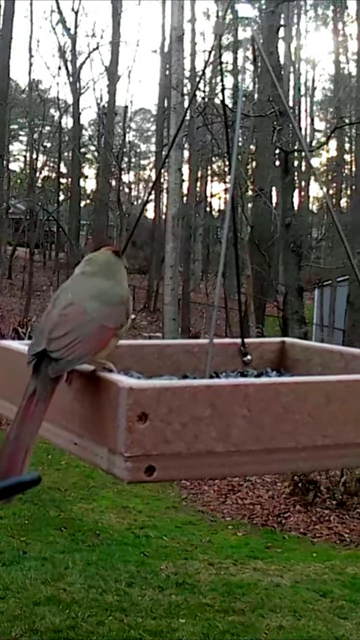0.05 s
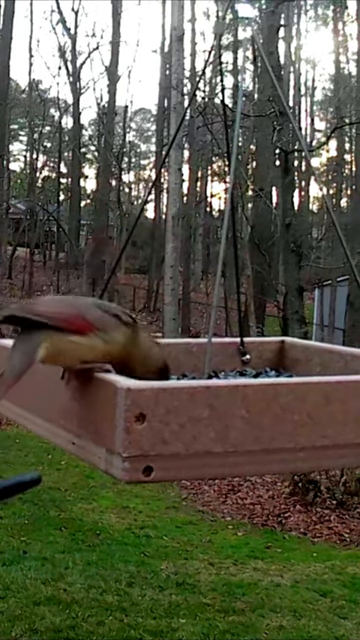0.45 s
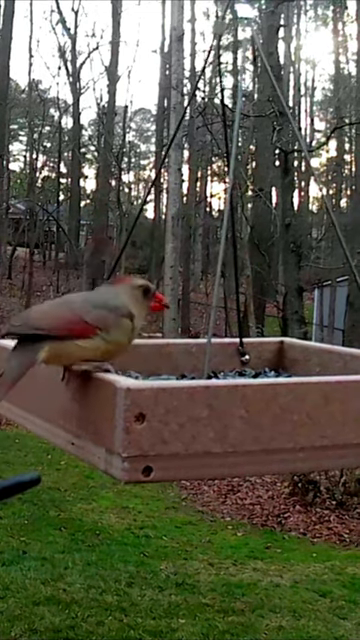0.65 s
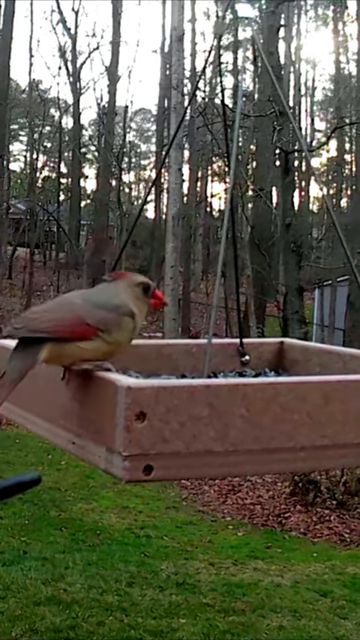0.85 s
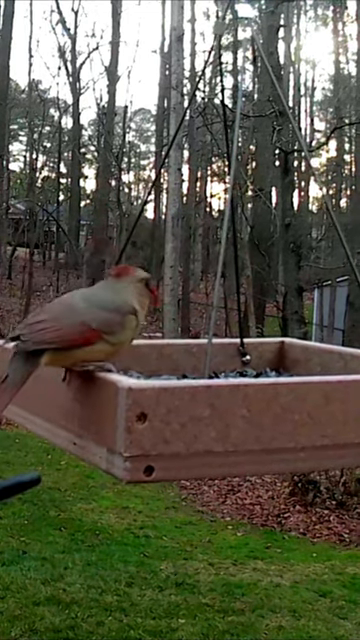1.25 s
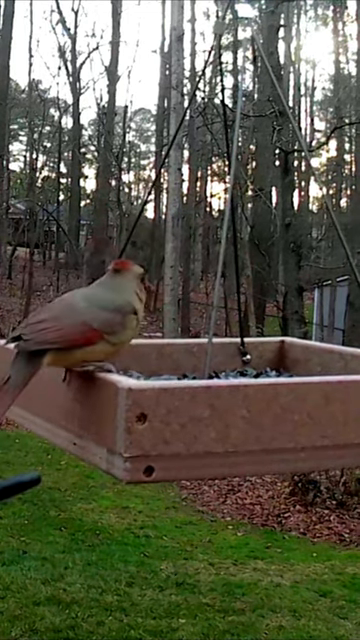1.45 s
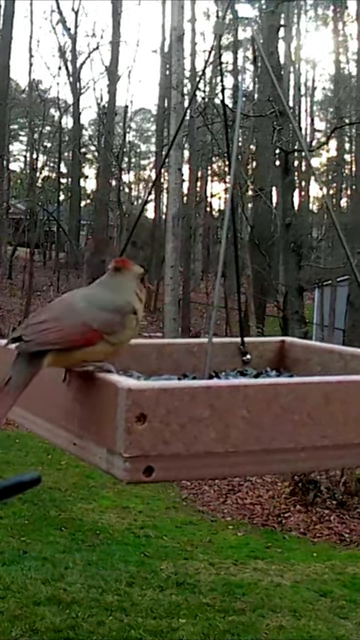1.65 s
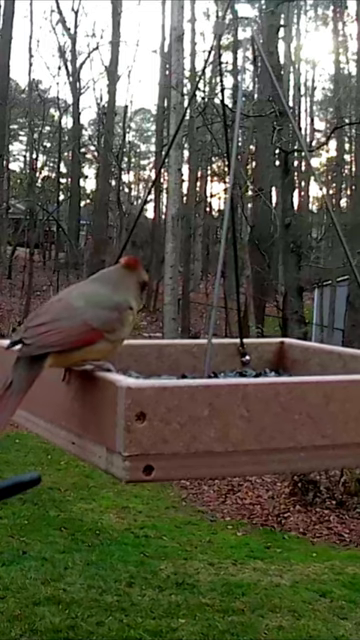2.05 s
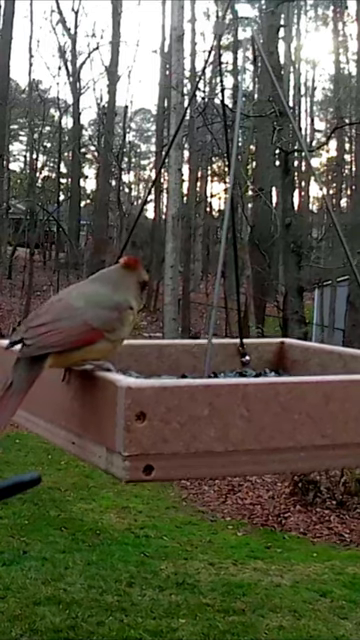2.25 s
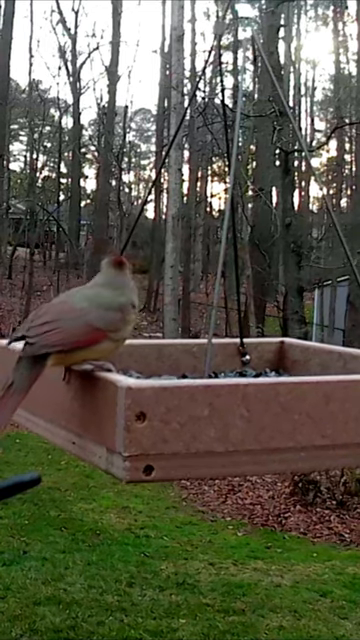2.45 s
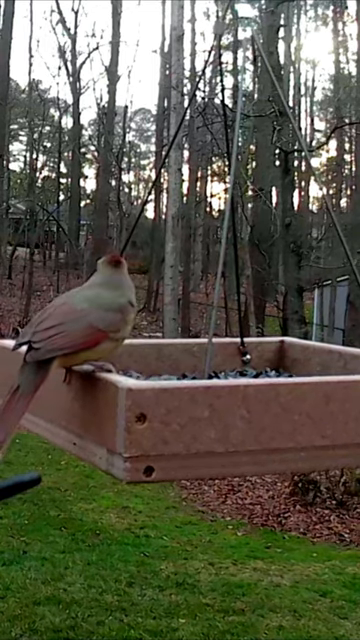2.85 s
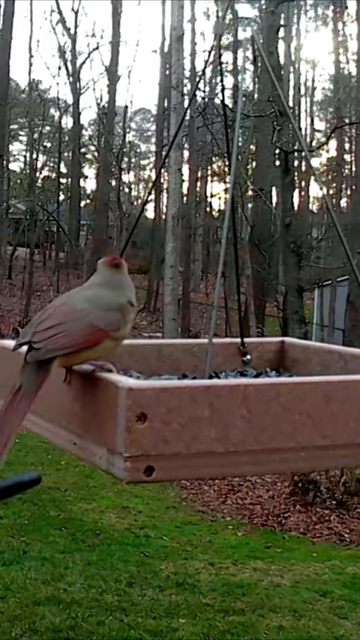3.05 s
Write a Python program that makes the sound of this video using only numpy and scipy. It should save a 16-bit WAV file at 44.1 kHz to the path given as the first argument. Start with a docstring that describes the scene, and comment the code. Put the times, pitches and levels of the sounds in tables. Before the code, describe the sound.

Small birds chirp faintly over a distant traffic hush, with one light, dry knock.

```python
"""Small birds whistle short slurred notes, near and far, in a wooded yard heard from a hanging feeder.
Each note is a gliding, nearly pure tone that the trees scatter into reverberation. A bird shifts on
the tray, exciting its low modes of shudder and sway, and ticks a seed in its beak. One dry double
knock rings out. Behind it all lies the broadband hush of distant traffic."""
import sys
import numpy as np
from scipy import signal
from scipy.fft import rfft, irfft
from scipy.io import wavfile
from scipy.ndimage import uniform_filter1d, map_coordinates

SR = 44100
rng = np.random.default_rng(int(sys.argv[2]) if len(sys.argv) > 2 else 0)


def persist_wave(psi):
    """Save psi, clipped to +-1, as 16-bit WAV."""
    counts = np.round(np.clip(psi, -1, 1) * 32767).astype(np.int16)
    wavfile.write(sys.argv[1], SR, np.atleast_2d(counts).T)


N = 136710
TOP_HZ = 15650  # upper band limit


def near_birds(gain_db=1, unsteadiness=0.0093):
    """Direct and reverberant sound: each whistle arrives straight, then scattered by the trees."""
    # near whistles: start_s, length_s, level_db before gain, crest_fraction, echo_db, five of pitch_hz
    whistles = [(.779, .035, -59, .55, -5, 4380, 4120, 3940, 3950, 4230),
                (.811, .040, -69, .6, -6, 6960, 7000, 7060, 7100, 7110),
                (.852, .022, -75, .5, -3, 7200, 7300, 7400, 7480, 7550),
                (.928, .094, -54.8, .76, -4, 4020, 4090, 3580, 3500, 4130),
                (1.566, .068, -65.5, .66, -7, 3380, 3370, 3180, 2830, 2300),
                (1.876, .058, -70, .3, 0, 4050, 4100, 4020, 4080, 4020),
                (1.908, .030, -67, .5, -1, 3350, 3480, 3520, 3480, 3400),
                (2.030, .080, -64, .62, -7, 3310, 3350, 3360, 2950, 2300),
                (2.060, .025, -70, .4, -5, 4350, 4330, 4280, 4230, 4200),
                (2.254, .068, -59.5, .85, -6, 3780, 4050, 4040, 3650, 3280),
                (2.335, .017, -60.5, .45, -7, 3280, 3360, 3540, 3830, 4100)]
    waver = unsteadiness * walk(400)
    direct, scattered = 0, 0
    for start_s, length_s, level_db, crest, echo_db, *pitches_hz in whistles:
        whistle = note(start_s, length_s, level_db + gain_db, crest, pitches_hz, waver)
        direct += whistle
        scattered += undb(echo_db) * whistle
    return direct + trees(scattered, t60_s=0.49)


def note(start_s, length_s, level_db, crest, pitches_hz, waver, edge_db=-10.5, fade_s=0.0023):
    """Frequency modulation: a tone glides through pitches evenly spaced in time, swells and fades."""
    out = np.zeros(N)
    span = np.arange(max(int(start_s * SR), 0), min(int((start_s + length_s) * SR), N))
    progress = np.linspace(0, 1, len(span))
    position = progress * (len(pitches_hz) - 1)
    glide = map_coordinates(np.array(pitches_hz, float), [position], order=3, mode="nearest")
    swell = undb(level_db + np.interp(progress, [0, crest, 1], [edge_db, 0, edge_db]))
    fade = np.clip(np.minimum(progress, 1 - progress) * length_s / fade_s, 0, 1)
    out[span] = swell * fade * tone(glide * (1 + waver[span]))
    return out


def feeder(rise_s=0.028):
    """Free vibration: shoves set off a shudder and a slower, longer sway; soft bumps damp quickly."""
    # the bird's shoves on the tray: start_s, sway_db, shudder_db
    shoves = [(0.206, -45.5, -38.5), (0.298, -31.5, -35), (.385, -30, -33), (1.418, -42.5, -60.5)]
    # soft bumps through the tray: start_s, level_db
    bumps = [(.06, -46), (3.069, -58)]
    # the tray's modes for each motion: frequency_hz, gain_db, t60_s
    sway_modes = [(8.293, -5, 4.7), (17.29, 4, 5.86), (24.88, -9.5, 2.2), (32.77, -18, 3)]
    shudder_modes = [(43.1, -18.5, 1.6), (50.2, -8.5, 2.3), (62.82, 2.5, 1.13), (70.2, -12, 0.92),
                     (119.9, -14.5, 0.69)]
    bump_modes = [(100, 0, 0.15), (126, -8, 0.065)]
    motion = 0
    for start_s, sway_db, shudder_db in shoves:
        motion += undb(sway_db) * ring(start_s, sway_modes, rise_s)
        motion += undb(shudder_db) * ring(start_s, shudder_modes, rise_s)
    return motion + sum(undb(db) * ring(start_s, bump_modes, rise_s) for start_s, db in bumps)


def knock(t, crack_s=0.013, body_s=0.043, echo_db=-10.5):
    """Impact excitation: two contacts each give a crack, woody modes and a hollow after-sound."""
    # contacts of the knock: start_s, level_db
    contacts = [(0.8261, -46), (0.8334, -48)]
    # resonances of the struck body: frequency_hz, gain_db, t60_s
    modes = [(640, -10, 0.16), (1199, -7, 0.29), (1315, 2, 0.17), (1512, 1.5, 0.063), (1580, 8.5, 0.083),
             (1650, -4.5, 0.063), (1885, 3, 0.12), (2137, 1, 0.076), (2477, -6.5, .07), (2560, -19, 0.058)]
    crack = undb(-8.5) * band_noise(1170, 2410)
    body = undb(-17.5) * band_noise(615, 1500)
    direct = 0
    for start_s, level_db in contacts:
        rattle = crack * decay(t, start_s, crack_s) + body * decay(t, start_s, body_s)
        direct += undb(level_db) * (ring(start_s, modes, rise_s=0.0019) + rattle)
    return direct + undb(echo_db) * trees(direct, t60_s=0.13)


def husking(t, tick_s=0.0022):
    """Brief contacts have broad spectra: a seed ticks as the bird turns it in its beak."""
    # husk ticks: start_s, level_db
    ticks = [(.766, -70), (.784, -74), (.792, -74)]
    return band_noise(3500, 6500) * sum(undb(db) * decay(t, start_s, tick_s) for start_s, db in ticks)


def far_birds(t, direct_db=2, echo_db=-2, unsteadiness=0.032):
    """Reverberation and superposition: remote calls blur among twitters and a wash of many birds."""
    # calls deep in the wood: start_s, length_s, level_db before gain, first_pitch_hz, last_pitch_hz
    calls = [(0.284, 0.072, -68, 3180, 3495), (.298, 0.047, -62, 1667, 1530),
             (0.301, 0.03, -69.5, 4800, 3470), (0.381, 0.17, -74, 3340, 3116),
             (.415, 0.024, -64, 2248, 2150), (.44, 0.044, -72, 4070, 4630),
             (0.444, 0.16, -73.5, 2464, 2750), (0.609, .045, -69.5, 4270, 3420),
             (0.653, 0.035, -67, 1990, 4590), (.66, 0.056, -71, 3620, 3830),
             (1.043, 0.081, -73, 2450, 1814), (1.163, .125, -68, 1635, 1627),
             (1.155, 0.083, -71, 3420, 3170), (1.206, 0.023, -65.5, 3900, 3580),
             (1.221, .09, -72, 3080, 2360), (1.294, 0.082, -69, 3260, 3140), (1.44, 0.047, -71, 3450, 3600)]
    # bursts of faint twittering: peak_s, spread_s, centre_hz, width_hz, level_db
    bursts = [(0.325, 0.012, 4200, 1400, -70.5), (.47, 0.039, 4450, 900, -73.5),
              (0.515, 0.11, 2720, 700, -71), (0.68, 0.011, 4400, 1800, -71),
              (1.206, 0.051, 3350, 1100, -74), (1.297, 0.056, 2700, 910, -71),
              (1.91, 0.024, 3690, 910, -69), (2.005, 0.21, 4430, 1190, -80.5)]
    # spectrum of the wash: frequency_hz, relative_density_db
    wash_spectrum = [(800, -17.5), (1600, -3), (2600, -10), (3300, 2), (4200, 0.5), (5000, -14),
                     (7000, -26.5)]
    # envelope of the wash: time_s, level_db
    wash_levels = [(0, -77), (.25, -76), (.45, -72.5), (.75, -76.5), (1.25, -73), (1.7, -76.5), (1.95, -73),
                   (2.3, -76), (2.6, -81.5), (3.1, -79.5)]
    waver = unsteadiness * walk(900)
    song = sum(note(start_s, length_s, level_db, crest=0.42, pitches_hz=pitches_hz, waver=waver)
               for start_s, length_s, level_db, *pitches_hz in calls)
    twitter = 0
    for peak_s, spread_s, centre_hz, width_hz, level_db in bursts:
        swell = undb(level_db - 5.1 * ((t - peak_s) / spread_s) ** 2)
        twitter += swell * band_noise(centre_hz - width_hz / 2, centre_hz + width_hz / 2)
    wash = shaped_noise(wash_spectrum) * undb(np.interp(t, *np.array(wash_levels).T))
    echoes = trees(song, t60_s=0.79)
    flicker = undb(2 * walk(90))
    return undb(direct_db) * song + undb(echo_db) * echoes + flicker * twitter + wash


def trees(sound, t60_s, delay_s=0.012, build_s=0.0069, treble_hz=5430, treble_t60_ratio=0.29):
    """Multiple scattering: dense echoes from the trunks come late and die away, the treble first."""
    age = np.maximum(np.arange(SR) / SR - delay_s, 0)
    scatter = rng.standard_normal(SR) * (1 - np.exp(-age / build_s))
    fall = np.exp(-np.log(1000) * age / t60_s)
    low = band(scatter, 100, treble_hz) * fall
    treble = band(scatter, treble_hz, TOP_HZ) * fall ** (1 / treble_t60_ratio)
    response = (low + treble) / np.linalg.norm(scatter * fall)
    return signal.fftconvolve(sound, response)[:N]


def traffic(t, steady_above_hz=5100, flicker_db=1.6, gain_db=0.5, drift=0.003):
    """Incoherent summation: distant traffic merges into a hush, steady on top, with faint whines."""
    # spectrum of the hush: frequency_hz, relative_density_db
    hush_spectrum = [(10, -19), (30, -11), (45, -17), (75, -14.5), (110, -20.5), (156, -24), (230, -27.5),
                     (390, -31), (480, -35), (700, -34.5), (920, -34), (1330, -37.5), (2000, -42.5),
                     (2800, -45), (3900, -48.5), (4700, -53), (5400, -53.5), (6300, -59.5), (7600, -62),
                     (10000, -62), (13000, -65.5), (15500, -63.5)]
    # envelope of its low middle: time_s, level_db before gain
    hush_levels = [(0, -67), (.5, -65), (1.0, -65.5), (1.6, -67.5), (2.4, -67.5), (3.1, -70)]
    # traffic whines that come and go: peak_s, spread_s, pitch_hz, level_db
    whines = [(1.36, 0.15, 322, -67.5), (0.84, 0.19, 396, -72), (1.49, 0.29, 398, -74),
              (1.03, 1.0, 436, -77)]
    noise = shaped_noise(hush_spectrum)
    noise /= np.std(band(noise, 300, 1200))  # the low middle sets the scale
    hz = np.arange(N // 2 + 1) * SR / N
    low = irfft(rfft(noise) / (1 + (hz / steady_above_hz) ** 4), N)
    envelope_db = np.interp(t, *np.array(hush_levels).T)
    hush = low * undb(envelope_db + flicker_db * walk(9.42)) + (noise - low) * undb(envelope_db.mean())
    whine = 0
    for peak_s, spread_s, pitch_hz, level_db in whines:
        swell = undb(level_db - 4.3 * ((t - peak_s) / spread_s) ** 2)
        whine += swell * tone(pitch_hz * (1 + drift * walk(25)))
    return undb(gain_db) * hush + whine


def ring(start_s, modes, rise_s):
    """Modal superposition: damped sinusoids set going at one moment."""
    age = np.maximum(np.arange(N) / SR - start_s, 0)
    ringing = sum(undb(db) * np.sin(2 * np.pi * hz * age) * np.exp(-np.log(1000) * age / t60_s)
                  for hz, db, t60_s in modes)
    return (1 - np.exp(-age / rise_s)) * ringing


def tone(hz):
    """A sinusoid of rms 1 whose phase is the integral of frequency."""
    return np.sqrt(2) * np.sin(2 * np.pi * np.cumsum(hz) / SR)


def decay(t, start_s, time_constant_s):
    """Exponential decay after a sudden onset."""
    return (t > start_s) * np.exp(-abs(t - start_s) / time_constant_s)


def shaped_noise(spectrum):
    """Spectral shaping: white noise weighted by a curve over log frequency, at rms 1."""
    points_hz, points_db = np.array(spectrum).T
    hz = np.maximum(np.arange(N // 2 + 1) * SR / N, 1)
    gain = undb(np.interp(np.log(hz), np.log(points_hz), points_db))
    return unit(irfft(rfft(rng.standard_normal(N)) * gain, N))


def band_noise(low_hz, high_hz):
    """Band-limited noise of rms 1."""
    return unit(band(rng.standard_normal(N), low_hz, high_hz))


def band(x, low_hz, high_hz):
    """Steep band-pass filtering."""
    return signal.sosfilt(signal.butter(4, [low_hz, high_hz], "band", fs=SR, output="sos"), x)


def walk(rate_hz):
    """Random modulation: held levels, smoothed twice, at rms 1."""
    hold = int(SR / rate_hz)
    steps = rng.standard_normal(N)[np.arange(N) // hold]
    return unit(uniform_filter1d(uniform_filter1d(steps, hold), hold))


def undb(db):
    """Decibels to amplitude ratio."""
    return 10 ** (np.asarray(db) / 20)


def unit(x):
    """Normalisation to rms 1."""
    return x / np.sqrt(np.mean(x ** 2) + 1e-30)


def scene():
    """Linear superposition: birds, knock, feeder and traffic add at one point."""
    t = np.arange(N) / SR
    return (traffic(t) + near_birds() + far_birds(t) + knock(t) + husking(t) + feeder())[None]


def record(dry):
    """Band limiting: a steep low-pass cuts the highest treble."""
    return signal.sosfilt(signal.ellip(10, .1, 70, TOP_HZ, fs=SR, output="sos"), dry)


dry = scene()
out = record(dry)
persist_wave(out)
```